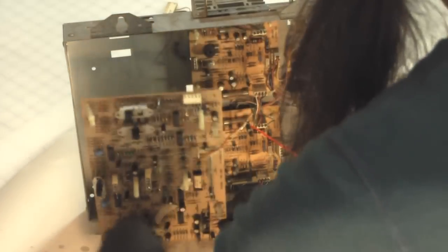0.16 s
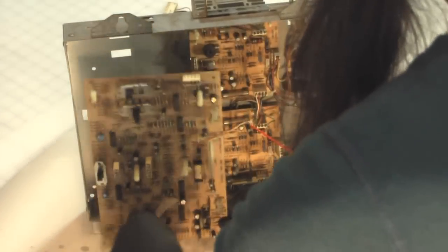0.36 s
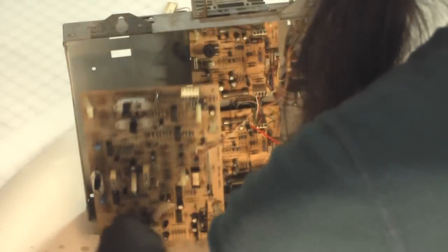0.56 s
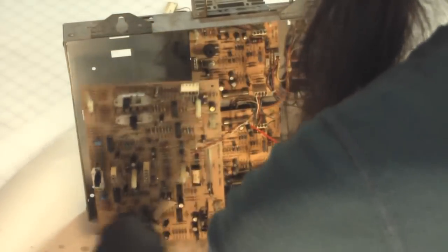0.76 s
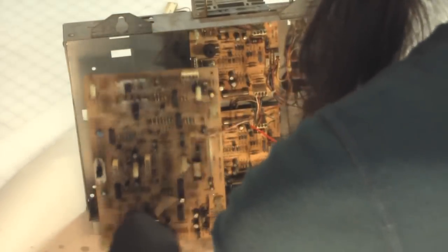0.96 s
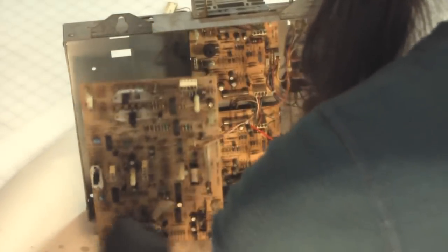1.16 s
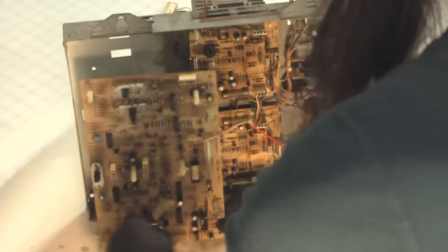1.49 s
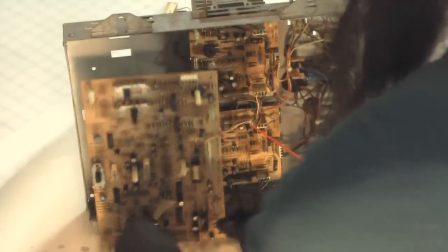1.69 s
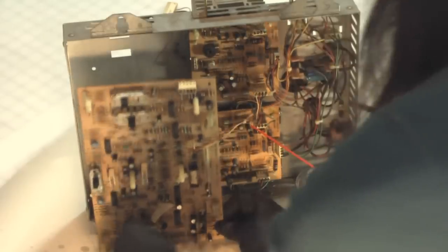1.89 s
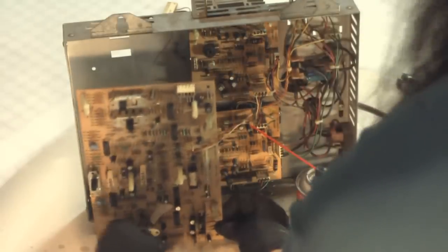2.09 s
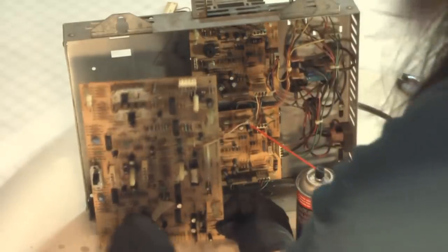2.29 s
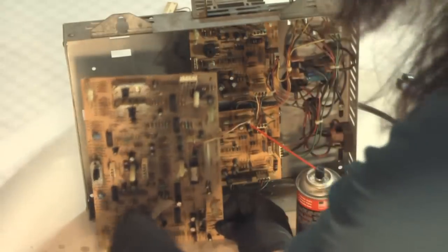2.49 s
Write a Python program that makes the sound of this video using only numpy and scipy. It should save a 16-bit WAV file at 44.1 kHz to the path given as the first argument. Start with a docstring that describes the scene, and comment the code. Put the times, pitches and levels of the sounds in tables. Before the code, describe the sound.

A small slide switch on a circuit board clicks back and forth from the start, about seven throws a second, close and slightly right. Each throw is a hollow snap followed at once by a sharp crack, with a brief board ring and short room echo. The last snap comes at 2.5 seconds, then one faint tick. Faint hiss and electrical hum lie underneath.

```python
"""A slide switch on a loose circuit board, worked back and forth in a small hard room over a faint hum.
From the start, about seven throws a second: the slider scrapes, the sprung detent snaps over with a
hollow tock, the slider cracks against its end stop, the board rings briefly and the room answers.
Between 1.1 and 1.9 s the hand bumps the board softly. Last snap at 2.5 s, then one faint tick."""
import sys
import numpy as np
from scipy import signal
from scipy.fft import rfft, irfft, next_fast_len
from scipy.io import wavfile

SR = 44100
rng = np.random.default_rng(int(sys.argv[2]) if len(sys.argv) > 2 else 0)


def to_wav(sig):
    """Store sig (one row per channel, or 1-D mono) as 16-bit WAV at the path in sys.argv[1].

    Samples outside -1..1 are clipped; the rate is SR.
    """
    pcm = np.clip(np.atleast_2d(sig), -1, 1) * 32767
    pcm = np.round(pcm).astype(np.int16)
    wavfile.write(sys.argv[1], SR, pcm.T)  # frames by channels


N = 116865
PAD = SR // 10  # samples ahead of t = 0
M = N + PAD
T = np.arange(SR // 10) / SR  # time axis of one contact, s

# detent snaps: t/s, crack/dB, treble tilt/dB, tock/dB, nominal tock f/Hz, housing/dB, spring/dB
SNAPS = [(0.119, -19.5, -2, -8.5, 1360, -23, -10), (0.2958, -18, -2, -15.5, 1290, -20.5, -15),
         (0.444, -16.5, 1.5, -10, 1640, -19, -8), (0.6094, -15.5, 0.5, -10, 1522, -22, -20),
         (0.7448, -18, -0.5, -11.5, 1340, -17, -7), (0.9058, -15.5, -4, -10.5, 1610, -13, -31),
         (1.0411, -16, 1, -6.5, 1680, -36, -7), (1.1867, -14.5, 1.5, -11, 1800, -12.5, -9),
         (1.3226, -16, -2, -10, 1322, -20, -2), (1.4554, -15.5, 1, -7, 1530, -10, -7),
         (1.5648, -15.5, -4, -8, 1397, -36, -14), (1.699, -12, 3.5, -6, 1885, -9, -4),
         (1.7991, -18.5, -1, -8.5, 1415, -12.5, -5), (1.9321, -13, -2.5, -10.5, 1696, -12, -14),
         (2.0432, -15, 3, -6, 1430, -14.5, -11), (2.185, -12.5, 0, -12.5, 857, -13, -8),
         (2.3271, -15, 0.5, -12, 1490, -26, -13), (2.4907, -14.5, 1.5, -13, 2000, -13.5, -14)]
# end-stop hits: t/s, crack/dB, treble tilt/dB, knock/dB
STOPS = [(-0.022, -9, 1, -13.5), (0.1304, -7.5, 2, -18.5), (0.3249, -11, 0.5, -16),
         (0.4589, -9.5, 1.5, -19), (0.6304, -8, 3.5, -15), (0.759, -10, 2.5, -16.5),
         (0.9265, -10, 1.5, -15.5), (1.054, -9.5, 0.5, -17.5), (1.1989, -12.5, -3, -14.5),
         (1.3358, -8, 3, -17), (1.4669, -10.5, -0.5, -13.5), (1.5801, -9.5, 2, -18),
         (1.7254, -11, -1, -16.5), (1.8124, -8.5, 1.5, -17.5), (1.9612, -10.5, 1, -14),
         (2.057, -9, 0.5, -17), (2.2035, -9, -1, -14), (2.3415, -9, 3, -18)]
# slider friction spectrum: f/Hz, level/dB
SCRAPE_COLOUR = [(100, -43), (1000, -10), (5000, -13), (7500, -13), (10000, -10.5), (13000, -4),
                 (16000, -15)]
# diffuse room sound: f/Hz, left-right coherence
ROOM_COHERENCE = [(150, 0.49), (700, 0.81), (1500, 0.61), (3000, 0.3), (12000, 0.017)]


def amp(db):
    return 10 ** (np.asarray(db) / 20)


def unit_rms(x):
    return x / np.sqrt(np.mean(x ** 2) + 1e-20)


def along(points, hz):
    """Interpolate (f/Hz, value) points on a log axis."""
    f, values = np.transpose(points)
    return np.interp(np.log(hz + 1), np.log(f + 1), values)


def filtered(x, response):
    """Apply the gain response(hz)."""
    n = x.shape[-1]
    size = 2 * next_fast_len(n // 2 + 4096)
    return irfft(rfft(x, size) * response(np.fft.rfftfreq(size, 1 / SR)), size)[..., :n]


def minimum_phase(db):
    """Causal unit-power response of the given shape."""
    cepstrum = irfft(np.log(unit_rms(amp(db))))
    half = len(cepstrum) // 2
    cepstrum[1:half] *= 2
    cepstrum[half + 1:] = 0
    return np.exp(rfft(cepstrum))


def spread(pair, coherence):
    """Mix two independent signals to left and right."""
    angle = lambda hz: np.arccos(np.clip(along(coherence, hz), -0.99, 0.99)) / 2
    mid, side = filtered(pair, lambda hz: np.array([np.cos(angle(hz)), np.sin(angle(hz))]))
    return np.array([mid + side, mid - side])


def add(track, t_s, sound):
    """Mix a sound into a padded track."""
    start = max(round(t_s * SR) + PAD, 0)
    part = track[:, start:start + sound.shape[-1]]
    part += sound[..., :part.shape[1]]


def varied(colour, sigma_db=1.6):
    """Random peaks and dips: every contact lands a little differently."""
    hz = np.geomspace(50, SR / 2, num=48)
    return np.column_stack([hz, along(colour, hz) + sigma_db * rng.standard_normal(len(hz))])


def burst(colour, hold_s, t60_s, tilt_db=0, rise_s=0.0002):
    """Chatter of tiny contacts. Rows: left, right, an equal-energy pulse to drive the room."""
    # direct click: f/Hz, left-right coherence
    coherence = [(200, 0.91), (1000, 0.99), (2500, 0.56), (6000, 0.77), (14000, 0.23)]
    envelope = amp(-60 * np.maximum(T - hold_s, 0) / t60_s) * (1 - np.exp(-T / rise_s))
    spectrum = rfft(rng.standard_normal((2, len(T))) * envelope)
    chatter = irfft(spectrum / (np.abs(spectrum) + 1e-12), len(T)) * np.sqrt(envelope)  # whitened
    chatter /= np.linalg.norm(chatter, axis=1, keepdims=True)
    pulse = rng.choice([-1, 1]) * signal.unit_impulse(len(T), int(hold_s * SR / 2))
    rows = np.linalg.norm(envelope) * np.vstack([spread(chatter, coherence), pulse])
    shelf = [(6500, 0), (9500, 1)]  # f/Hz, share of tilt
    return filtered(rows, lambda hz: minimum_phase(along(colour, hz) + tilt_db * along(shelf, hz)))


def ring(hz, rise_s, t60_s):
    """One damped mode."""
    return np.sin(2 * np.pi * hz * T) * amp(-60 * T / t60_s) * (1 - np.exp(-T / rise_s))


def air_and_hum(air_db=-50, hum_db=-68, hum_hz=118.4):
    """Quiet room air and an electrical hum."""
    # air spectrum: f/Hz, level/dB
    air_colour = [(25, -64), (70, -7.5), (120, -6), (200, 1), (600, 0.5), (1500, 2), (5000, -8),
                  (16000, -9)]
    noise = spread(rng.standard_normal((2, N)), ROOM_COHERENCE)
    air = filtered(noise, lambda hz: amp(along(air_colour, hz)))
    hum = np.sin(2 * np.pi * hum_hz * np.arange(N) / SR)
    return amp(air_db) * unit_rms(air) + amp(hum_db) * unit_rms(hum)


def room(x, highpass_hz=3450, tail_db=-6.5, rise_s=0.00072):
    """Two echoes off small hard surfaces, mostly treble, and a diffuse tail."""
    # wall echoes: delay/s, left/dB, right/dB
    walls = [(.0205, -23, -28), (.0231, -28, -19)]
    # tail spectrum: f/Hz, level/dB
    tail_colour = [(100, 7), (250, 7), (400, 3.5), (750, 2), (1200, 2), (2200, 2), (4500, 1.5), (7500, 4),
                   (9500, -1.5), (15000, 2)]
    # tail decay: f/Hz, T60/s
    tail_t60 = [(150, .3), (450, 0.34), (1200, 0.32), (5000, 0.31), (9500, 0.29), (16000, 0.15)]
    out = np.zeros((2, M))
    bright = filtered(x, lambda hz: 1j * hz / (highpass_hz + 1j * hz))
    for delay_s, left_db, right_db in walls:
        add(out, delay_s - PAD / SR, amp([[left_db], [right_db]]) * bright)
    # a fresh tail from 2 ms before each snap and stop
    cuts = sorted(round(hit[0] * SR) + PAD - SR // 500 for hit in [*SNAPS, *STOPS])
    for start, end in zip([0] + cuts, cuts + [M]):
        hz, t, noise = signal.stft(rng.standard_normal((2, SR // 3)), SR, nperseg=256)
        level_db = along(tail_colour, hz)[:, None] - 60 * t / along(tail_t60, hz)[:, None]
        tail = spread(signal.istft(noise * amp(level_db), SR, nperseg=256)[1], ROOM_COHERENCE)
        tail *= 1 - np.exp(-np.arange(tail.shape[1]) / SR / rise_s)
        tail *= amp(tail_db) / np.linalg.norm(tail[0])
        add(out, (start - PAD) / SR, signal.fftconvolve(x[None, start:end], tail, axes=1))
    return out


def board(x, ring_db=1.5):
    """The board adds its resonances to every contact."""
    # board modes: f/Hz, level/dB, T60/s
    modes = [(474, -9.5, 0.06), (561, 3.5, 0.15), (747.5, 3.5, 0.037), (1013, -6.5, 0.025),
             (1145, -1, 0.049), (1350, -25, 0.15), (1727, -4, 0.099), (1893, -7, 0.025), (3540, 0.5, 0.017),
             (3890, 2, 0.028), (4245, -3, 0.032), (4730, 2, 0.037), (5796, -9.5, 0.0099)]

    def response(hz):
        resonance = 0
        for mode_hz, db, t60_s in modes:
            damping = 1j * hz * np.log(1000) / (np.pi * t60_s)
            resonance += amp(db) * damping / (mode_hz ** 2 - hz ** 2 + damping)
        return 1 + amp(ring_db) * resonance
    return filtered(x, response)


def handling():
    """Dull bumps of the hand, light ticks of the loose slider."""
    # hand bumps: t/s, level/dB
    bumps = [(1.107, -57.5), (1.614, -52.5), (1.854, -49.5)]
    # bump spectrum: f/Hz, level/dB
    bump_colour = [(30, -28), (90, -12), (150, 0), (230, 3), (400, -27), (2000, -55)]
    # slider ticks: t/s, level/dB
    ticks = [(1.462, -17), (2.628, -42.5)]
    out = np.zeros((3, M))
    for t_s, db in bumps:
        add(out, t_s, amp(db) * burst(bump_colour, hold_s=0.03, t60_s=0.027))
    for t_s, db in ticks:
        add(out, t_s, amp(db) * burst(SCRAPE_COLOUR, hold_s=0.0017, t60_s=0.011))
    return out


def end_stop(rub_s=0.0037, knock_lag_s=0.000984, mean_flight_s=0.0026, rebound_step_db=-6):
    """The slider rubs home, cracks against the housing, knocks the board and rebounds twice."""
    # slider-on-housing spectrum: f/Hz, level/dB
    crack_colour = [(100, -34.5), (500, -7.5), (1400, -24.5), (2800, -2.5), (3800, -4.5), (5600, 3),
                    (7400, -8), (9300, 0), (11200, 4), (13000, -3), (16000, -12.5)]
    # board knock spectrum: f/Hz, level/dB
    knock_colour = [(30, -45), (120, -15), (300, -7.5), (700, -1), (1400, 0), (2300, -5), (5000, -17)]
    out = np.zeros((3, M))
    for t_s, crack_db, tilt_db, knock_db in STOPS:
        add(out, t_s - rub_s, amp(-30.5) * burst(SCRAPE_COLOUR, hold_s=rub_s, t60_s=0.019))
        crack = burst(varied(crack_colour), hold_s=0.00097, t60_s=0.016, tilt_db=tilt_db)
        add(out, t_s, amp(crack_db - 4) * crack)
        knock = burst(knock_colour, hold_s=0.0018, t60_s=0.019)
        add(out, t_s + knock_lag_s, amp(knock_db - 11) * knock)
        flights_s = mean_flight_s * (0.5 + rng.random(size=2))
        for k, lag_s in enumerate(np.cumsum(flights_s), 1):
            rebound = burst(crack_colour, hold_s=0.00047, t60_s=0.0026, tilt_db=tilt_db)
            add(out, t_s + lag_s, amp(crack_db + k * rebound_step_db) * rebound)
    return out


def tock(nominal_hz, start_ratio=1.29, sag_s=0.00715, rise_s=0.0021, t60_s=0.011):
    """The board flexes: high bending waves arrive first, so the pitch falls."""
    cycles = nominal_hz * start_ratio * sag_s * (1 - np.exp(-T / sag_s))
    return np.sin(2 * np.pi * cycles) * amp(-60 * T / t60_s) * (1 - np.exp(-T / rise_s))


def detent(spring_hz=9210):
    """A scrape, then the detent snaps over: crack, hollow tock, housing ring, spring ping."""
    # snap spectrum: f/Hz, level/dB
    crack_colour = [(100, -21.5), (500, -5), (900, -6.5), (1600, -0.5), (3100, -8), (4100, -4),
                    (5900, -3.5), (7600, -12.5), (9400, 5), (10500, 1), (13000, 1), (16000, -15.5)]
    # switch housing modes: f/Hz, level/dB
    housing_modes = [(2540, 1.5), (4350, -4)]
    out = np.zeros((3, M))
    for t_s, crack_db, tilt_db, tock_db, tock_hz, housing_db, spring_db in SNAPS:
        lead_s = 0.0048 * amp(-0.19 * (tock_db + 5.5))  # shorter on a harder throw
        add(out, t_s - lead_s, amp(-31) * burst(SCRAPE_COLOUR, hold_s=0.0013, t60_s=0.026))
        crack = burst(varied(crack_colour), hold_s=0.0015, t60_s=0.01, tilt_db=tilt_db)
        add(out, t_s, amp(crack_db - 2) * crack)
        add(out, t_s, amp(tock_db + 2.5) * tock(tock_hz))
        for mode_hz, mode_db in housing_modes:
            mode = ring(mode_hz * rng.normal(1, 0.025), rise_s=0.0015, t60_s=0.01)
            add(out, t_s, amp(housing_db + mode_db) * mode)
        ping = ring(spring_hz * rng.normal(1, 0.0073), rise_s=0.00017, t60_s=0.0055)
        add(out, t_s, amp(spring_db - 2) * ping)
    return out


def scene():
    """The switch, a little to the right, in its room."""
    # direct-sound balance: f/Hz, left minus right/dB
    balance = [(200, -2.5), (600, -1.5), (1200, -2.5), (2200, -6.5), (4500, -7), (9000, -2.5), (14000, 0.5)]
    switch = board(detent() + end_stop() + handling())
    direct = filtered(switch[:2], lambda hz: amp(along(balance, hz) * np.array([[0.5], [-0.5]])))
    return (direct + room(switch[2]))[:, PAD:] + air_and_hum()


def record(dry, cutoff_hz=16100):
    """Clip at full scale, then a steep low-pass."""
    return filtered(np.clip(dry, -1, 1), lambda hz: 1 / np.sqrt(1 + (hz / cutoff_hz) ** 160))


dry = scene()
out = record(dry)
to_wav(out)
```